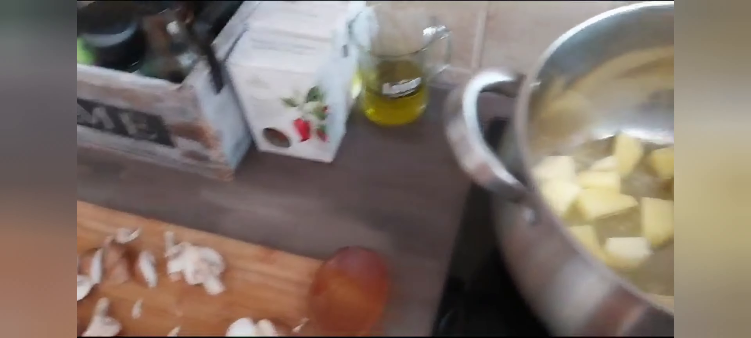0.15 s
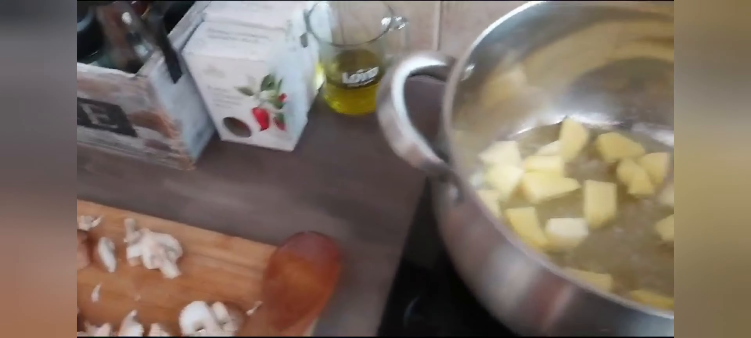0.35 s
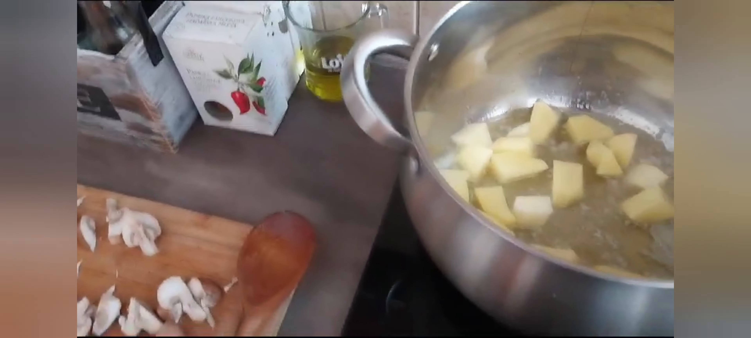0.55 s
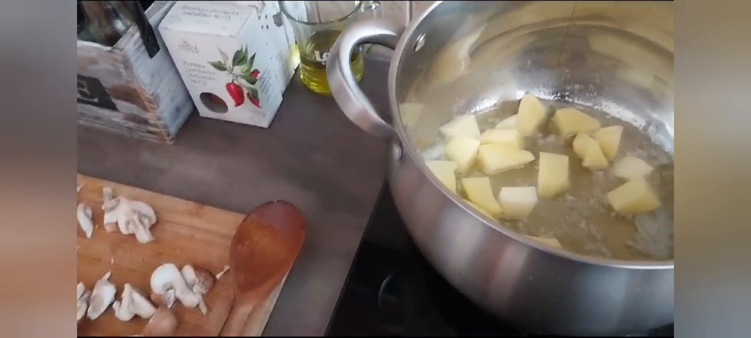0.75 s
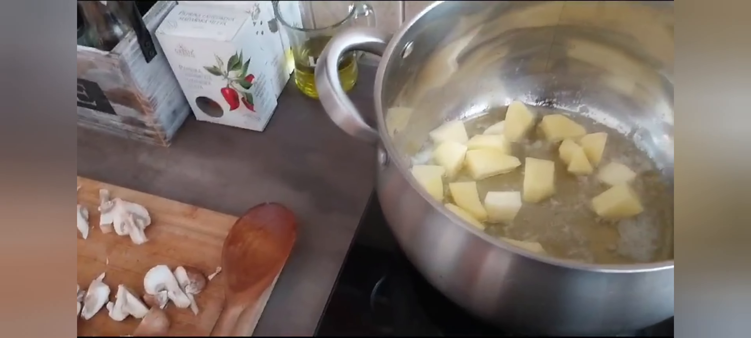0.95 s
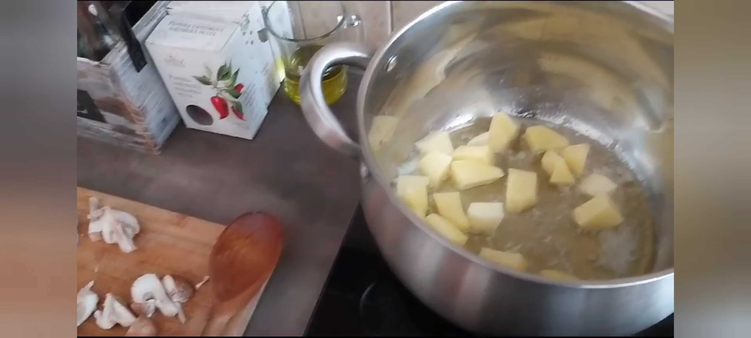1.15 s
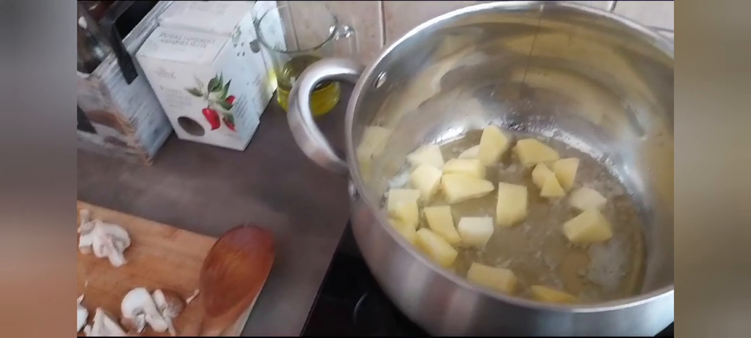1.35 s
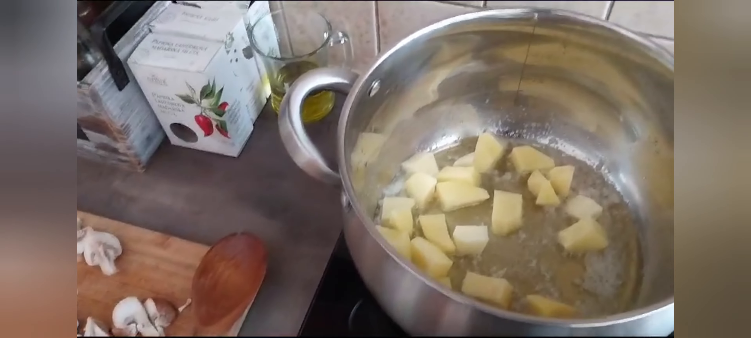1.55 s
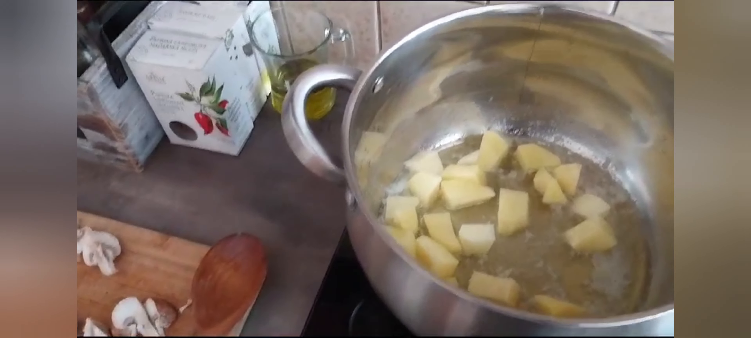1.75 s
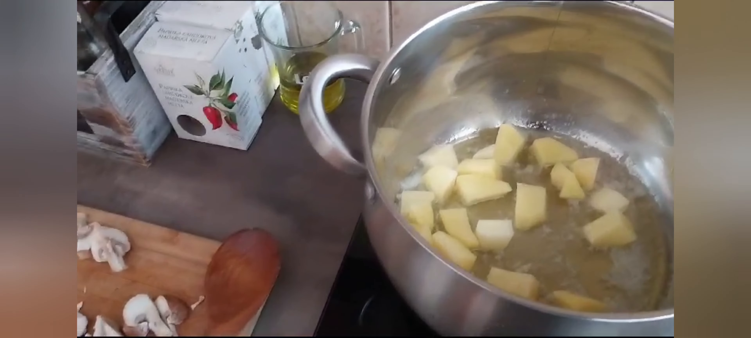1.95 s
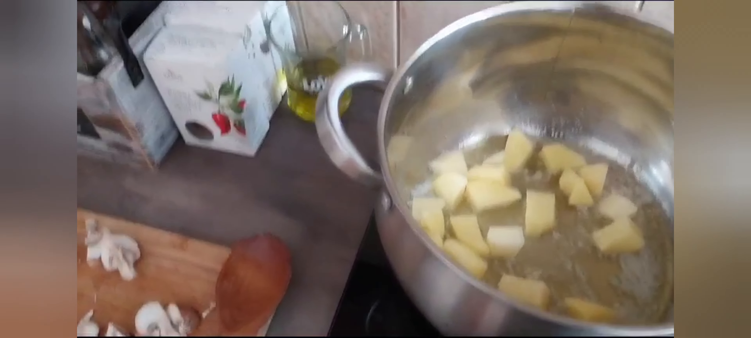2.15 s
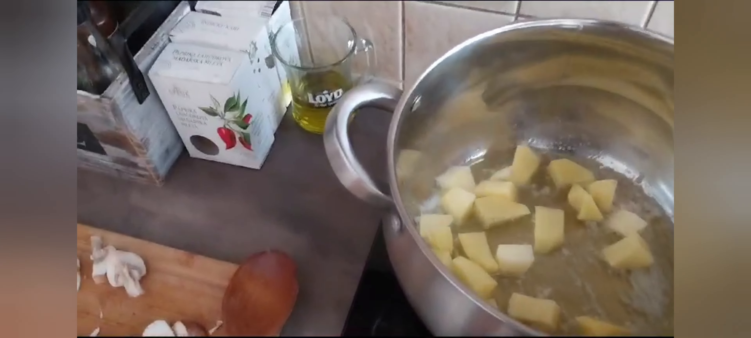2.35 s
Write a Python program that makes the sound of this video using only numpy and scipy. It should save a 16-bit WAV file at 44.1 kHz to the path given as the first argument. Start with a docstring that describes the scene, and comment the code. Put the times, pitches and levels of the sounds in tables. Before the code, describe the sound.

Wood is bumped and jostled near a pot of softly sizzling potatoes, loose metal clinking briefly

```python
"""Kitchen: potato pieces sizzle gently in butter in a steel pot, with a few spits of fat.
Close by, mostly stronger on the right, hollow wood is knocked and jostled: it thuds, rattles and rumbles,
and loose metal things on it clink. Wood and metal are struck decaying modes, rumble is resonant noise,
sizzle is hiss plus bubble grains coloured by the pot, spits are band-limited snaps and puffs.
Wood, metal and spits echo in the room."""
import sys
import numpy as np
from scipy import signal
from scipy.fft import rfft, irfft
from scipy.io import wavfile
from scipy.ndimage import uniform_filter1d

SR = 44100
rng = np.random.default_rng(int(sys.argv[2]) if len(sys.argv) > 2 else 0)


def log_audio(samples):
    """Write samples as a 16-bit WAV file to the path given in sys.argv[1]."""
    # one column per channel
    frames = np.atleast_2d(samples).T
    # limit to full scale, then quantise
    limited = np.clip(frames, -1, 1)
    pcm = np.round(limited * 32767).astype(np.int16)
    wavfile.write(sys.argv[1], SR, pcm)


N = 105840

# All pans are left minus right.
# sizzle over time: (time [s], relative level [dB], treble level [dB], pan [dB])
SIZZLE_TIMELINE = [(0.0, -42, -9.5, -1), (0.03, -49.5, -5, -1.5), (0.2, -50.5, -10.5, -2.0),
                   (0.29, -48.5, -7, -4), (0.33, -47, -10.5, -1.5), (0.53, -50, -9.5, -1.0),
                   (0.57, -49.5, -7, -1), (0.59, -46.5, -14, 0), (0.61, -49, -9.5, 0.5),
                   (0.8, -47.5, -8.5, -1.5), (1.21, -48.5, -10.5, -0.5), (1.245, -46, -8, -0.5),
                   (1.28, -49.5, -10.5, -1.5), (1.73, -49, -11, 0), (1.81, -46, -12.5, -1.5),
                   (2.05, -48.5, -13, -1.0), (2.29, -48, -9.5, -1.5), (2.35, -49, -12, -1),
                   (2.4, -48.5, -12, -1)]
# sizzle spectrum with the microphone's colour, before the pot's colour: (frequency [Hz], relative density [dB])
SIZZLE_SPECTRUM = [(88, -56), (150, -35), (315, -8.5), (414, -11.5), (545, -4), (660, -10.5), (720, -26),
                   (805, -44), (888, -10), (1450, -9), (1560, -7), (2140, -3), (2760, -2), (3700, -3),
                   (5000, -2.5), (5910, -4), (7500, -5), (7900, -9), (8200, -16), (8900, -15.5),
                   (12000, -12.5), (14500, -15.5), (16000, -14.5)]
# resonances and a dip in the pot's colour: (frequency [Hz], width [Hz], boost or cut before POT_LIFT_DB [dB])
POT_COLOUR = [(1073, 76, 4.5), (1617, 176, 4.5), (2028, 114, 0.5), (3283, 77, 1), (5250, 60, -1),
              (5570, 120, -14), (5600, 73, 7)]
# left-right likeness of the hiss: (frequency [Hz], correlation [-1..1])
HISS_LIKENESS = [(60, 0.82), (180, 0.71), (550, 0.6), (1650, 0.2), (4970, 0.025), (15000, 0.028)]
TREBLE_HZ, TREBLE_REF_DB, TREBLE_PAN_DB = 9300, -11.5, -2.2
POT_LIFT_DB, SIZZLE_GAIN_DB = 5.5, 3.0
HISS_DB, PATCH_DB, FLICKER_DB = 2.5, 2, -0.2
BUBBLE_DB, BUBBLES_PER_S, BUBBLE_SPREAD_DB, BUBBLE_CYCLES = -5.5, 1700, 2.5, 6.2
BUBBLE_PEAK_HZ, CLUMP_DB = 5970, 2.5

# jostling, one list per stretch:
# (time [s], relative rattle level [dB], weight [dB], hardness [dB], rumble level [dB], deep rumble level [dB])
JOSTLE_STRETCHES = [
    [(0.0, -56, 11.5, -7, -55, -51.5), (0.064, -54.5, 6, -16, -50, -67), (0.158, -79, 3, 20, -60.5, -85),
     (0.222, -66.5, 11, 15, -62, -58)],
    [(0.246, -18, -4, 1, -33, -36), (0.264, -31.5, 0, -6, -42, -35), (0.31, -29.5, -8, -9, -30.5, -29),
     (0.376, -35, -13.5, -17, -43.5, -40), (0.46, -61, 4, -1, -46.5, -46), (0.504, -42, 6.5, 2, -51, -75),
     (0.532, -44, -12, -23, -43, -46), (0.564, -59, 14, 2, -46.5, -56),
     (0.668, -61, 17.5, -6, -50.5, -48.5), (0.808, -40.5, 4, -7, -48, -64)],
    [(0.829, -32, -4, -12, -48, -61), (0.853, -46, 10, 6, -42, -42), (0.899, -48.5, 7, 3, -53, -55),
     (0.937, -38.5, -4.5, -26, -39, -46), (0.995, -41, 1.5, -20, -51.5, -67), (1.045, -56, 2, 10, -44, -54),
     (1.259, -56.5, 6.5, 5, -52, -70), (1.311, -71, -4, 2, -61, -64), (1.365, -60, -10, -2, -51, -52),
     (1.409, -75, 12, 10, -65, -63), (1.482, -54.5, -11, -2, -54, -52.5)],
    [(1.503, -43, -17, 0, -57, -50), (1.531, -36, 9, -6, -46, -49), (1.553, -40, -2.5, -3, -41.5, -47),
     (1.641, -70, 2, -4, -53, -52), (1.672, -56, 1, -13, -57, -56)],
    [(1.692, -35, -16, -6, -64, -50), (1.714, -66, -4, -13, -53, -53), (1.766, -31, -3, -5, -44.5, -50),
     (1.808, -56, 10, -18, -37.5, -62), (1.86, -44.5, 7, -18, -42.5, -48), (1.89, -46.5, 9, -3, -46, -61),
     (1.914, -52, -5, -15, -47.5, -63), (2.048, -66, 4, 2, -63, -60), (2.4, -73, -16, 9, -66, -77)],
]
# start of each stretch, all but the first just before a knock: (time [s])
STRETCH_STARTS_S = [0, .2445, .8265, 1.5005, 1.6895]
# low resonances of the rumble: (frequency [Hz], width [Hz], relative level [dB])
LOW_RESONANCES = [(108.5, 35.4, -5.5), (114.1, 18.4, 2), (254, 210, -10.5)]
# deep resonances of the rumble: (frequency [Hz], width [Hz], relative level [dB])
DEEP_RESONANCES = [(63, 12, 6), (80.3, 22, -11.5)]
RUMBLE_LIKENESS, RUMBLE_PAN_DB, RUMBLE_LUMPS_DB = 0.96, -2, -2
STEADY = 0.7  # how far chance swells of the rumble are evened out [0..1]

# knocks on the wood: (time [s], relative level [dB], hardness [dB], weight [dB])
KNOCKS = [(0.245, -10.5, -11.5, -13.5), (0.2525, -13.5, -17, -10.5), (0.263, -18.5, -23, -19.5),
          (0.272, -18, -11.5, -16), (0.294, -26, -10.5, -0.5), (0.313, -24, -10.5, -13),
          (0.326, -27, -14, -22), (0.432, -36, -3.5, -13), (0.447, -39, -4, -18),
          (0.733, -37.5, -16.5, -11), (0.827, -17.5, -9.5, -14), (0.925, -20, -42, -12),
          (0.934, -23, -18, -17), (0.971, -29, -11, -11.5), (1.501, -19.5, -13, -18.5),
          (1.537, -37, -16, -28), (1.549, -26.5, -18, -6.5), (1.69, -27, -14, -17.5),
          (1.732, -27, -30, -21), (1.75, -19, -30, -10), (1.769, -19.5, -24, -23), (1.785, -52, -27, -14),
          (1.8148, -24.5, -16.5, -25), (1.833, -29, -29, -14), (1.846, -20.5, -31, -13),
          (1.864, -41, -31, -17), (1.915, -27, -15.5, -17.5), (1.95, -37, -13, -18)]
# modes of the wood: (frequency [Hz], level [dB], t60 [s], share of hardness, share of weight,
# pan [dB], left phase lead [rad])
WOOD_MODES = [(264.5, -9, 0.16, 0.27, 0.94, -3.5, 0.56), (370, -5, 0.09, 0.32, 0.71, -0.5, -0.35),
              (449.4, -16.5, 0.28, 0.58, 0.33, -0.5, 0.1), (570.7, -10, 0.039, 0.036, 0.58, -17, -0.79),
              (619.4, -0.5, 0.069, 0.11, 0.055, -7.5, -1.2), (628.6, -12, 0.16, 0.24, 0, 0.5, -1.5),
              (650, -6.5, 0.1, 1.46, 0, -4, 1.1), (890, -10, 0.025, 0.78, 0.33, 24.5, -1.7),
              (1001, 5.5, 0.021, 1.17, 0.19, -0.5, -0.78), (1107, -3, 0.011, 0.72, 1, -17, -1.77),
              (1409, -11.5, 0.061, 2.2, 0.082, -1, -2.1), (1853, -21.5, 0.064, 0.71, 0.57, 19, 2)]
HARD_REF_DB, HEAVY_REF_DB = -12.5, -14  # here a knock drives the modes at their listed levels
KNOCK_DB, BOUNCES_PER_S, BOUNCE_DB, BOUNCE_T60_S = -7.5, 360, -11.5, 0.059
RATTLE_DB, RATTLES_PER_S, RATTLE_SPREAD_DB = -25.5, 1200, 1.5
RATTLE_HARD_REF_DB, RATTLE_HEAVY_REF_DB = 10.5, -3

# spits of fat, sharp ticks and short scuffs:
# (time [s], relative level [dB], centre [Hz], width [Hz], puff decay to 1/e [s], pan [dB])
SPITS = [(0.2424, -24, 4570, 6200, 0.0076, -7.5), (0.29, -27.5, 11500, 8160, 0.0027, -7),
         (.244, -37.5, 10900, 5000, 0.0058, -8), (0.604, -35.5, 1270, 1080, 0.0084, 2),
         (0.477, -40, 11200, 5000, 0.0041, -4), (.586, -26, 6300, 3840, 0.0065, -5),
         (0.5843, -31.5, 12700, 6000, 0.0037, -12), (1.228, -35, 5500, 5000, 0.0033, -5),
         (1.256, -29, 5500, 2500, 0.002, 1), (1.287, -35, 5830, 4000, 0.0014, -8),
         (1.4425, -36.5, 9000, 9000, 0.0042, -4), (1.9856, -37.5, 6340, 3870, 0.0044, -12.5),
         (2.085, -38, 6000, 1970, 0.002, -15), (2.099, -34.5, 6600, 2500, 0.005, -3),
         (2.1829, -34.5, 6300, 3200, 0.005, -6), (2.222, -35, 3020, 3600, 0.0014, 4),
         (2.268, -35, 6000, 2500, 0.0012, 3), (2.2726, -33, 6100, 3500, 0.0012, -16),
         (2.281, -35, 7000, 2000, 0.0016, -13), (2.299, -31, 7500, 10900, 0.00077, -8),
         (2.367, -34, 10800, 6000, 0.0025, 0)]
SPIT_DB, SNAP_DB = -4.5, 0.5

# clinks: (time [s], level [dB], centre [Hz], t60 of the scatter [s], pan [dB])
CLINKS = [(0.2446, -24, 3080, 0.035, -2), (0.258, -31, 2570, 0.13, -2), (0.289, -18.5, 2880, 0.041, -4.5),
          (.3, -41, 2460, 0.078, -3), (0.432, -37, 2300, 0.08, -2), (0.8281, -30.5, 2630, 0.13, -2)]
# modes of the loose metal: (frequency [Hz], level [dB], t60 [s])
METAL_MODES = [(1923, 3, 0.02), (2350, -6, 0.027), (2717, -7, 0.03), (2900, -8, 0.034), (3100, -4.5, 0.022),
               (3520, -7.5, 0.023), (4050, -7.5, 0.037), (4550, -4, .04), (5000, -7, .03)]
CLINK_DB_PER_OCTAVE, SCATTER_PER_S, SCATTER_DB, CLINK_RISE_S = -18, 900, -5.5, 0.00085

# kitchen echo: (frequency [Hz], t60 [s])
ROOM_T60 = [(100, 0.43), (600, 0.39), (3000, 0.88), (12000, 0.41)]
WOOD_ROOM_DB, SPIT_ROOM_DB = -6.5, -10.5
EDGE_HZ = 15770


def amp(db):
    """Decibels to gain."""
    return 10 ** (np.asarray(db) / 20)


def evened(x):
    """Scales to an rms of one."""
    return x / np.sqrt(np.mean(x ** 2) + 1e-20)


def smoothed(x, size):
    """Two passes of a moving average."""
    return uniform_filter1d(uniform_filter1d(x, size=size), size=size)


def read(points, hz):
    """Reads a spectrum table on a log-frequency axis."""
    f, value = np.transpose(points)
    return np.interp(np.log(hz + 1), np.log(f + 1), value)


def curve(table, col, t=None):
    """Reads one column of a time table."""
    rows = np.vstack(table)
    return np.interp(np.arange(N) / SR if t is None else t, rows[:, 0], rows[:, col])


def sides(db):
    """Left and right gains for a left-minus-right level."""
    return amp(np.array([db / 2, -db / 2]))


def clicks(per_s, spread_db):
    """Random train of signed clicks, most small, a few large."""
    hit = rng.random(N) < per_s / SR
    size = np.minimum(rng.exponential(1, N), 5)
    return hit * rng.choice([-1., 1.], N) * amp(spread_db * size)


def bubbles():
    """Short grains of rising pitch in 24 sizes, each size with its own left-right delay."""
    out = np.zeros((2, N))
    for hz in np.geomspace(1200, 14000, 24):
        cycles = np.arange(round(BUBBLE_CYCLES * 3 * SR / hz)) * hz / SR
        chirp = np.sin(2 * np.pi * cycles * (1 + 0.058 * cycles))
        grain = chirp * np.exp(-cycles / BUBBLE_CYCLES * 2) * hz / 4000
        train = signal.oaconvolve(clicks(BUBBLES_PER_S / 24, BUBBLE_SPREAD_DB), grain)[:N]
        out += np.array([train, np.roll(train, rng.integers(-30, 30))])
    return evened(out)


def sizzle():
    """Patchy hiss of tiny bubbles plus single larger ones, coloured by the pot."""
    hz, t, z = signal.stft(bubbles(), SR, nperseg=512, noverlap=384)
    power = (abs(z) ** 2).mean((0, 2))
    z = z / np.sqrt(uniform_filter1d(power, size=9))[:, None]  # flat spectrum
    clumps = evened(uniform_filter1d(rng.standard_normal(len(t)), size=12))
    loudest = (hz > 900) / (1 + np.log2((hz + 1) / BUBBLE_PEAK_HZ) ** 2)
    single = z * amp(BUBBLE_DB + CLUMP_DB * clumps) * loudest[:, None]

    a, b, c, d, patches = rng.standard_normal((len(t), len(hz), 5)).T
    patches = uniform_filter1d(uniform_filter1d(patches, size=6, axis=0), size=16, axis=1)
    flicker = evened(uniform_filter1d(rng.standard_normal(len(t)), size=4))
    same = read(HISS_LIKENESS, hz)[:, None]
    left = a + 1j * b
    right = same * left + np.sqrt(1 - same ** 2) * (c + 1j * d)
    hiss = np.array([left, right]) / np.sqrt(2)
    hiss = hiss * amp(HISS_DB + PATCH_DB * evened(patches) + FLICKER_DB * flicker)

    treble_shelf = 1 / (1 + (TREBLE_HZ / (hz[:, None] + 1)) ** 16)
    treble_db = (curve(SIZZLE_TIMELINE, col=2, t=t) - TREBLE_REF_DB) * treble_shelf
    x = signal.istft((hiss + single) * amp(treble_db), SR, nperseg=512, noverlap=384)[1][:, :N]
    f = np.fft.rfftfreq(N, 1 / SR)
    pot_db = sum((POT_LIFT_DB + db) / (1 + (2 * (f - p) / w) ** 2) for p, w, db in POT_COLOUR)
    colour = amp(read(SIZZLE_SPECTRUM, f) + pot_db) * sides(TREBLE_PAN_DB * (f > TREBLE_HZ))
    x = evened(irfft(rfft(x) * colour, N))
    return x * amp(curve(SIZZLE_TIMELINE, col=1) + SIZZLE_GAIN_DB) * sides(curve(SIZZLE_TIMELINE, col=3))


def jostle(col):
    """Reads one column of the jostling; it switches tables at four listed times, each just before a knock."""
    which = np.searchsorted(STRETCH_STARTS_S, np.arange(N) / SR, "right") - 1
    return np.choose(which, [curve(table, col=col) for table in JOSTLE_STRETCHES])


def rumble(modes, col):
    """Lumpy noise through low resonances, nearly the same on both sides."""
    a, b = rng.standard_normal((2, N))
    right = RUMBLE_LIKENESS * a + np.sqrt(1 - RUMBLE_LIKENESS ** 2) * b
    lumps = evened(smoothed(rng.standard_normal(N), 900))
    noise = np.array([a, right]) * amp(RUMBLE_LUMPS_DB * np.tanh(lumps))
    hz = np.fft.rfftfreq(N, 1 / SR)
    body = sum(amp(db) / (1 + (2 * (hz - f) / w) ** 2) for f, w, db in modes)
    body = body * np.minimum(hz / 45, 1) ** 6  # low cut
    x = evened(irfft(rfft(noise) * body, N))
    swell = smoothed((x ** 2).mean(0), 1400)
    x = evened(x / (swell + .05) ** (STEADY / 2))
    return x * amp(uniform_filter1d(jostle(col), size=400)) * sides(RUMBLE_PAN_DB)[:, None]


def wood():
    """Knocks with their quick bounces, and a rattle of small taps, ring one set of modes."""
    t, u = np.arange(8000) / SR, np.arange(4000) / SR
    rattle = evened(clicks(RATTLES_PER_S, RATTLE_SPREAD_DB)) * amp(jostle(col=1) + RATTLE_DB)
    rattle_heavy_db = jostle(col=2) - RATTLE_HEAVY_REF_DB
    rattle_hard_db = np.minimum(jostle(col=3) - RATTLE_HARD_REF_DB, 0)
    size = (len(KNOCKS), 4000)
    shapes = rng.standard_normal(size) * (rng.random(size) < BOUNCES_PER_S / SR)
    shapes = shapes * amp(BOUNCE_DB - 60 * u / BOUNCE_T60_S)
    shapes[:, 0] = 1  # the knock itself
    out = np.zeros((2, N))
    for hz, db, t60, hard, heavy, pan_db, lead in WOOD_MODES:
        drive = rattle * amp(hard * rattle_hard_db + heavy * rattle_heavy_db)
        for (s, level_db, hard_db, heavy_db), shape in zip(KNOCKS, shapes):
            at = round(s * SR)
            tone_db = hard * (hard_db - HARD_REF_DB) + heavy * (heavy_db - HEAVY_REF_DB)
            drive[at:at + len(shape)] += shape * amp(level_db + KNOCK_DB + tone_db)
        turn = 2 * np.pi * hz * t + np.array([[lead / 2], [-lead / 2]])
        rise = np.minimum(t * hz * 1.18, 1)  # under one cycle
        ring = sides(pan_db)[:, None] * amp(db - 60 * t / t60) * np.sin(turn) * rise
        out += signal.oaconvolve(drive[None], ring, axes=1)[:, :N]
    return out


def spits():
    """Each spit is one click ringing briefly in its band, with a dying puff of noise."""
    out, t = np.zeros((2, N + 2048)), np.arange(2048) / SR
    noise, hz = rng.standard_normal((len(SPITS), 2, 2048)), np.fft.rfftfreq(2048, 1 / SR)
    quadrature = np.array([[0], [np.pi / 2]])
    for (s, db, centre_hz, width_hz, decay_s, pan_db), n in zip(SPITS, noise):
        band = evened(irfft(rfft(n) / (1 + (2 * (hz - centre_hz) / width_hz) ** 4), 2048))
        u = np.pi * width_hz * t
        snap = u ** 2 * np.exp(2 - 2 * u) * np.cos(2 * np.pi * centre_hz * t + quadrature)
        spit = band * np.exp(-t / decay_s) + amp(SNAP_DB) * snap
        out[:, round(s * SR):][:, :2048] += spit * amp(db + SPIT_DB) * sides(pan_db)[:, None]
    return out[:, :N]


def clatter():
    """Loose metal jumps at knocks: a clink rings modes near its centre and scatters into smaller ones."""
    out, t = np.zeros((2, N + 8000)), np.arange(4000) / SR
    size = (len(CLINKS), len(METAL_MODES))
    luck = rng.standard_normal((*size, 2, 4000))
    sparse = rng.random((*size, 1, 4000)) < SCATTER_PER_S / SR
    rise = np.minimum(t / CLINK_RISE_S, 1)
    quadrature = np.array([[0], [np.pi / 2]])
    for (s, db, centre_hz, scatter_t60, pan_db), taps in zip(CLINKS, luck * sparse):
        taps = taps * amp(SCATTER_DB - 60 * t / scatter_t60)
        taps[..., 0] = 1  # the first strike
        for (hz, mode_db, t60), tap in zip(METAL_MODES, taps):
            turn = 2 * np.pi * hz * t + 2 * np.pi * rng.random() + quadrature
            level_db = db + mode_db + CLINK_DB_PER_OCTAVE * abs(np.log2(hz / centre_hz))
            ring = amp(level_db - 60 * t / t60) * np.sin(turn) * rise
            clink = signal.fftconvolve(tap, ring, axes=1)
            out[:, round(s * SR):][:, :7999] += clink * sides(pan_db)[:, None]
    return out[:, :N]


def room(x):
    """Sparse taps of random sign, each band dying at its own speed."""
    taps = np.zeros((2, SR // 2))
    at = np.arange(200, SR // 2 - 20, 20)
    size = (2, len(at))
    np.put_along_axis(taps, at + rng.integers(0, 20, size), rng.choice([-1., 1.], size), 1)
    hz, t, z = signal.stft(taps, SR, nperseg=256)
    decay = amp(-60 * t / read(ROOM_T60, hz)[:, None])
    tail = signal.istft(z * decay, SR, nperseg=256)[1]
    return signal.fftconvolve(x, tail / np.linalg.norm(tail[0]), axes=1)[:, :N]


def scene():
    """Wood, clatter and spits with the kitchen's echo, over rumble and sizzle."""
    knocked = wood()
    sharp = spits() + clatter()
    low = rumble(LOW_RESONANCES, col=4) + rumble(DEEP_RESONANCES, col=5)
    echo = room(amp(WOOD_ROOM_DB) * knocked + amp(SPIT_ROOM_DB) * sharp)
    return knocked + sharp + echo + low + sizzle()


def record(dry):
    """Linear-phase low-pass: the upper band limit."""
    lowpass = signal.firwin(1023, EDGE_HZ, window=("kaiser", 10), fs=SR)
    return signal.oaconvolve(dry, lowpass[None], "same")


dry = scene()
out = record(dry)
log_audio(out)
```